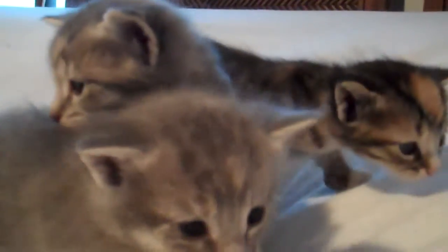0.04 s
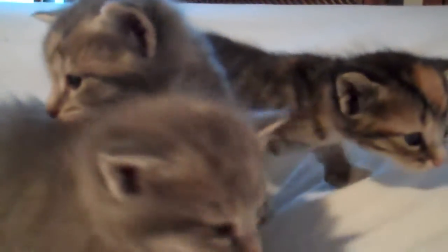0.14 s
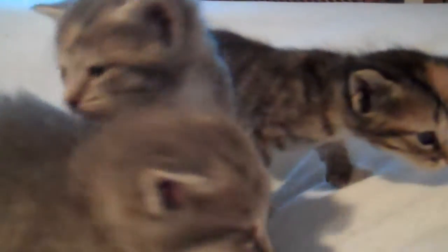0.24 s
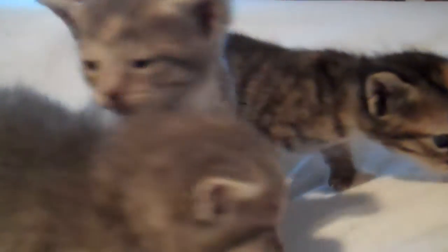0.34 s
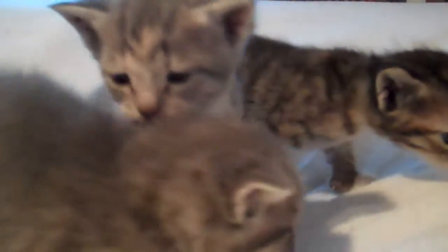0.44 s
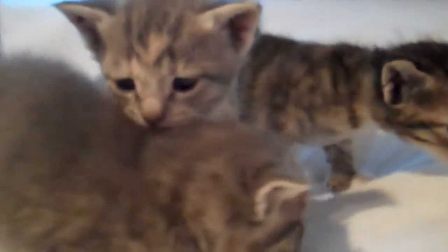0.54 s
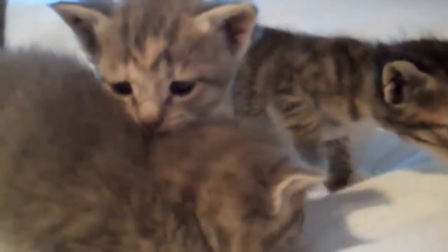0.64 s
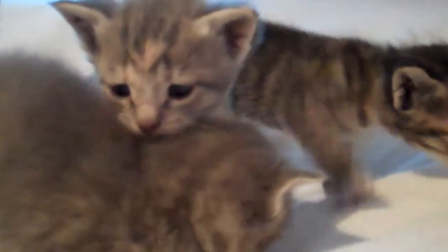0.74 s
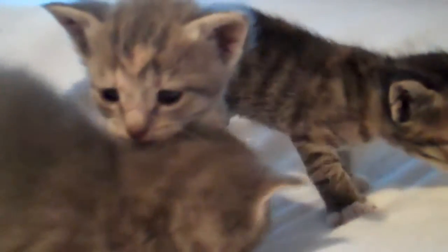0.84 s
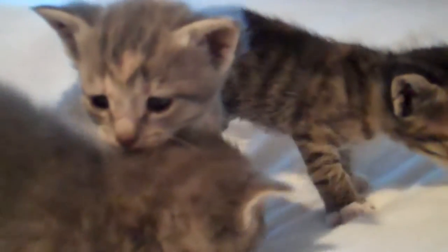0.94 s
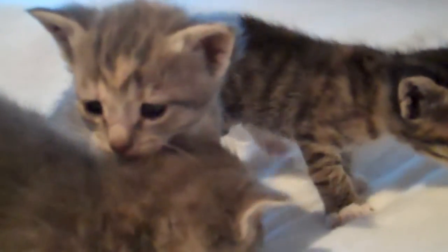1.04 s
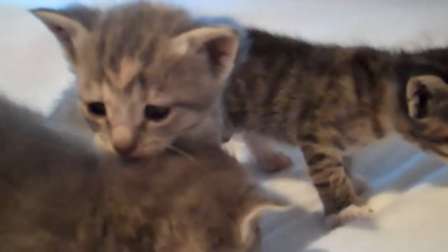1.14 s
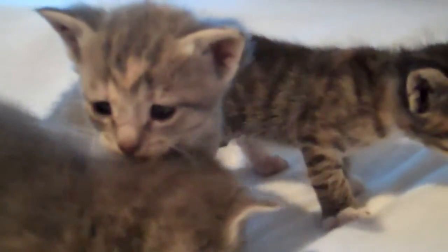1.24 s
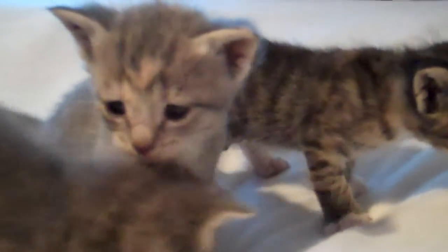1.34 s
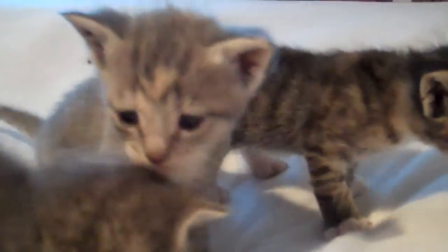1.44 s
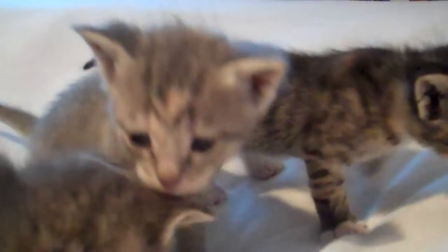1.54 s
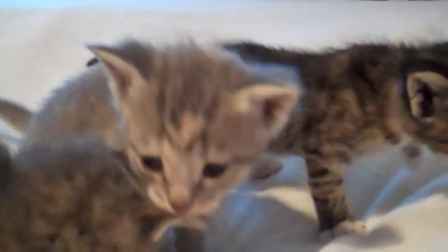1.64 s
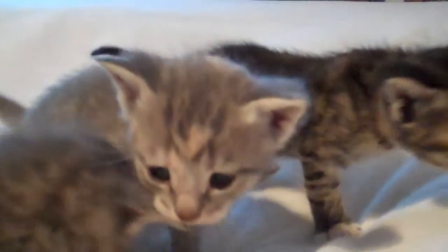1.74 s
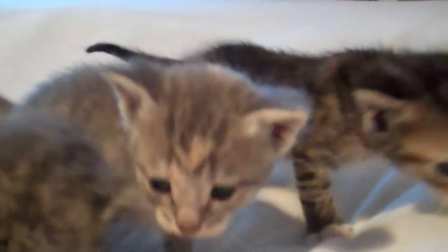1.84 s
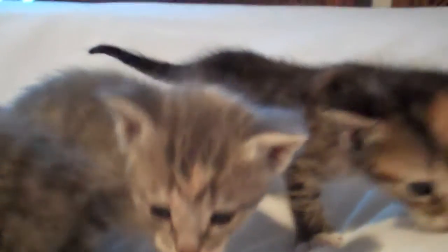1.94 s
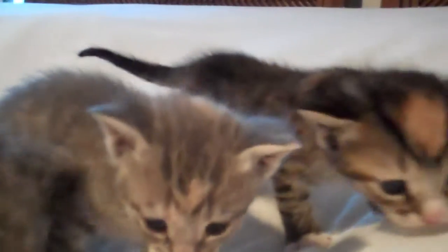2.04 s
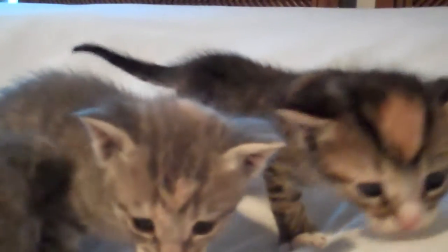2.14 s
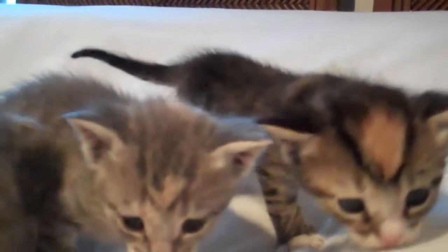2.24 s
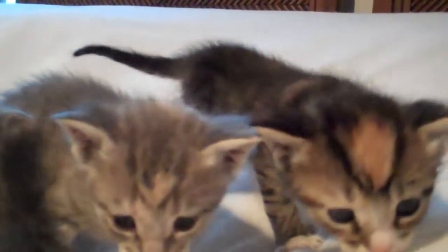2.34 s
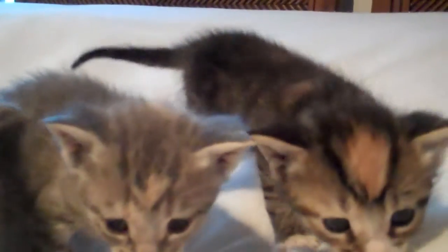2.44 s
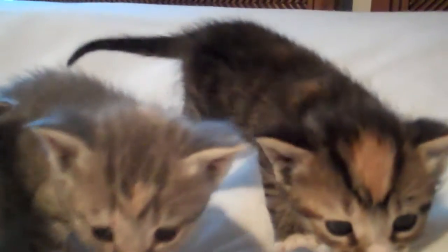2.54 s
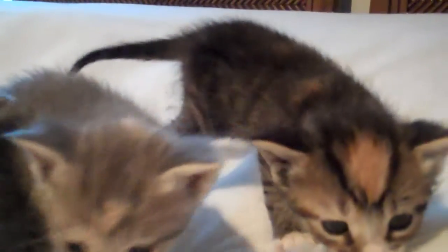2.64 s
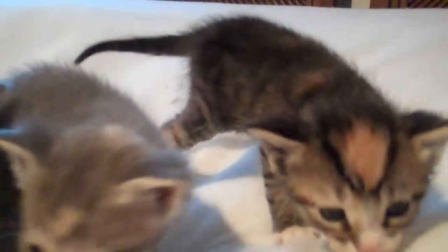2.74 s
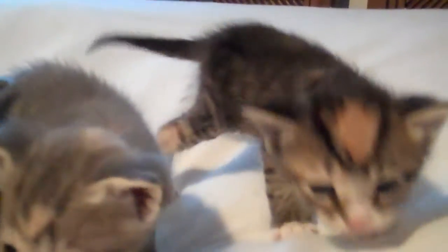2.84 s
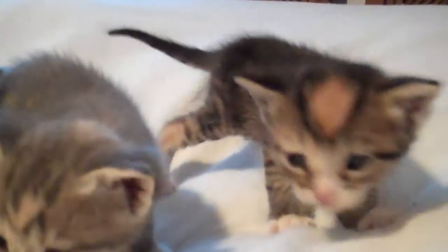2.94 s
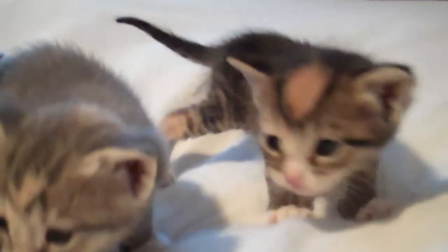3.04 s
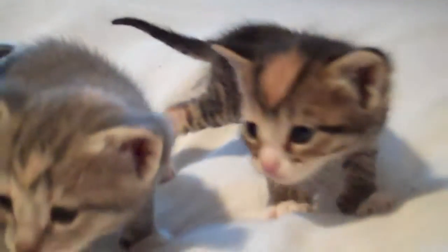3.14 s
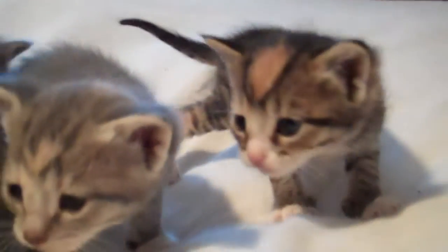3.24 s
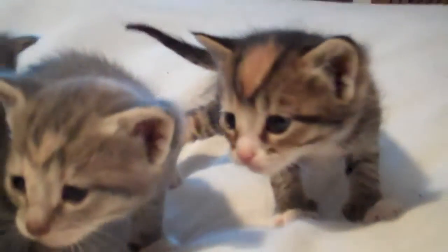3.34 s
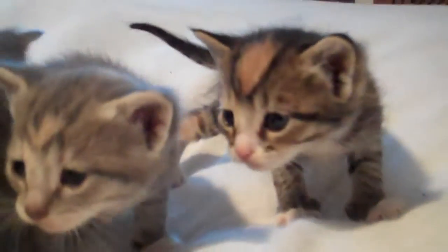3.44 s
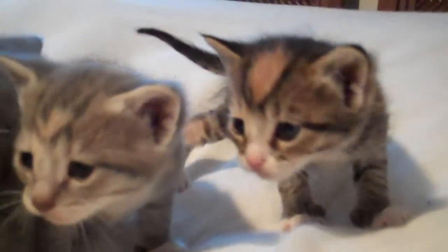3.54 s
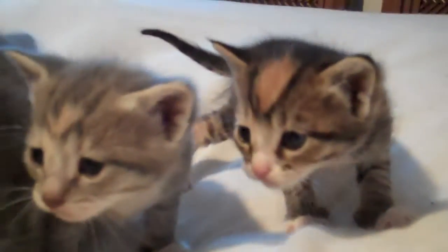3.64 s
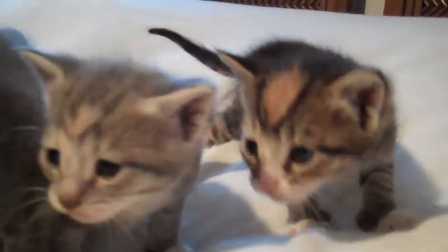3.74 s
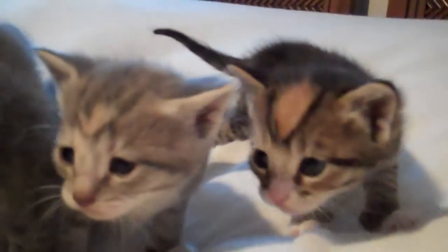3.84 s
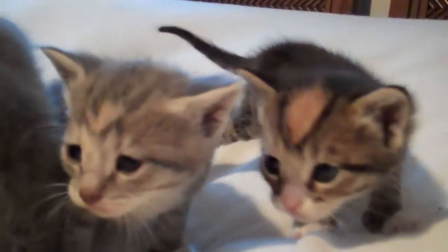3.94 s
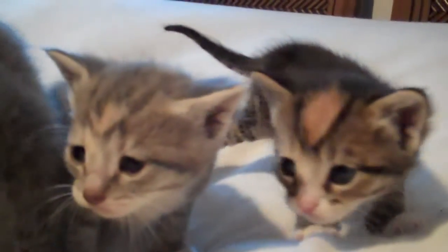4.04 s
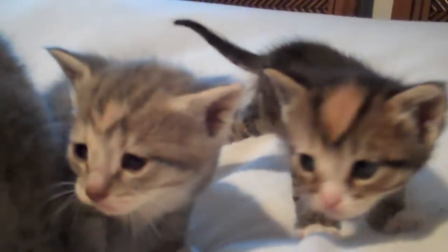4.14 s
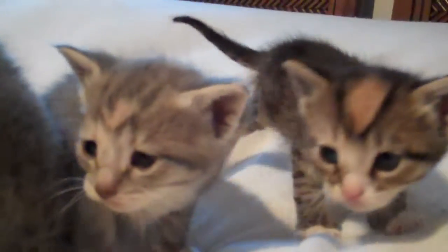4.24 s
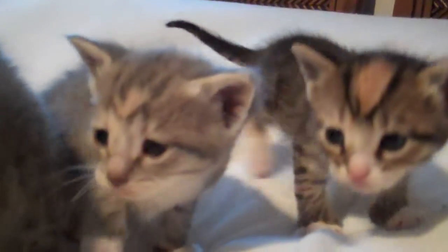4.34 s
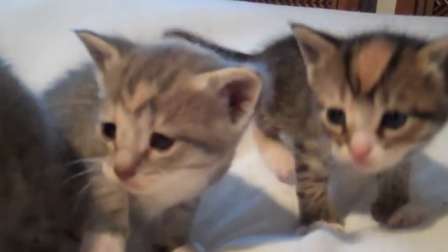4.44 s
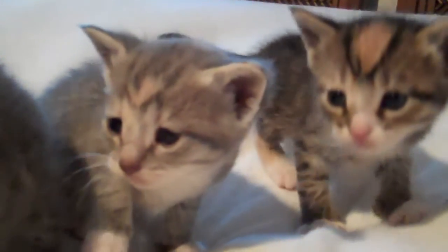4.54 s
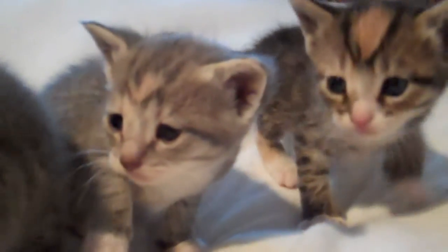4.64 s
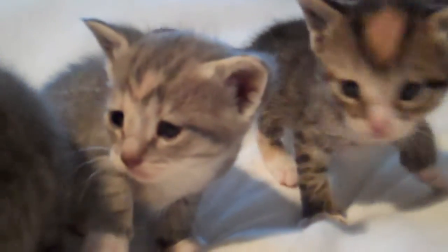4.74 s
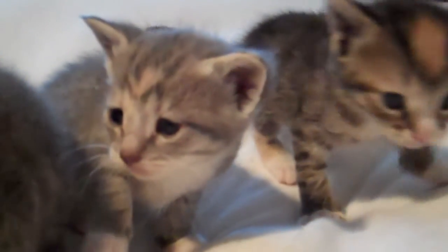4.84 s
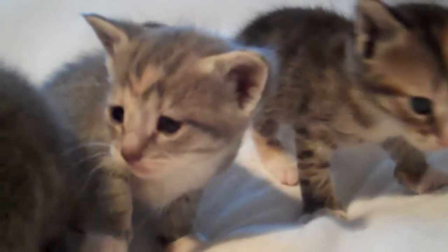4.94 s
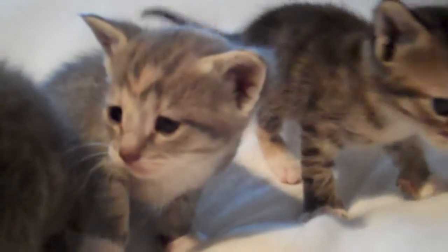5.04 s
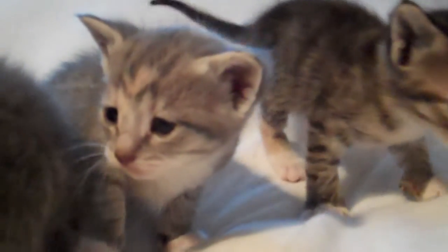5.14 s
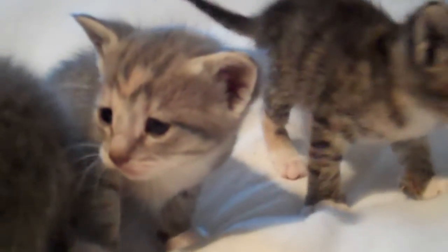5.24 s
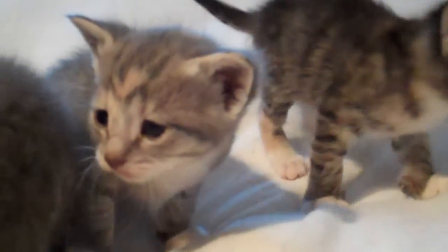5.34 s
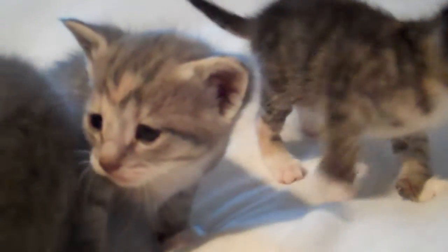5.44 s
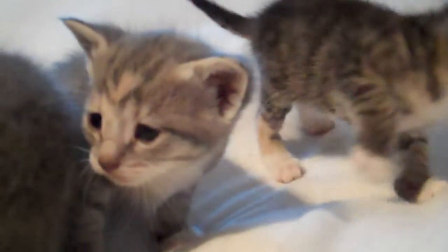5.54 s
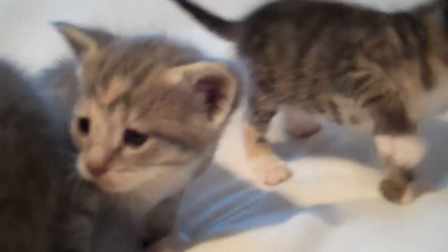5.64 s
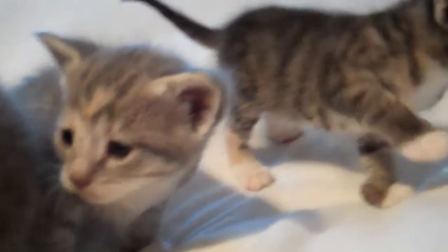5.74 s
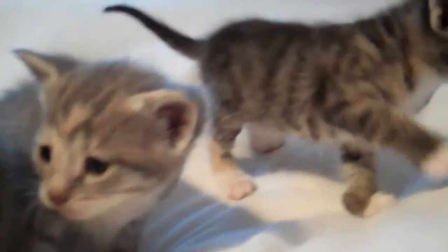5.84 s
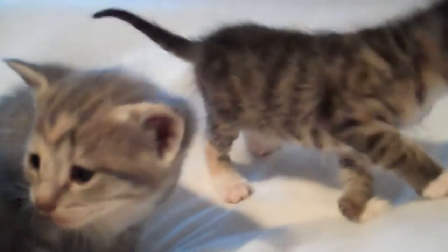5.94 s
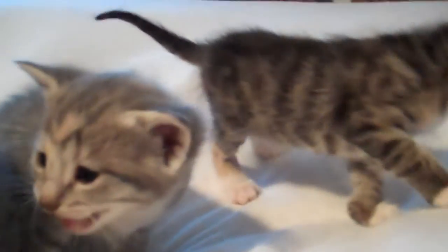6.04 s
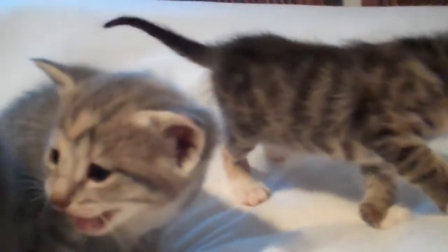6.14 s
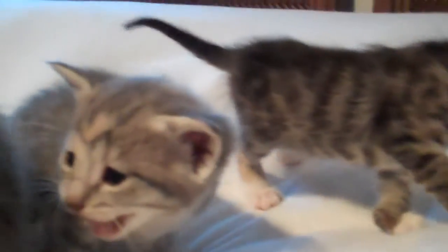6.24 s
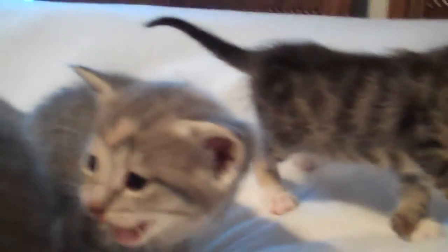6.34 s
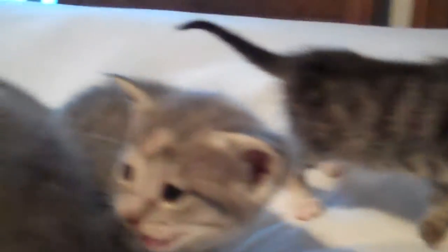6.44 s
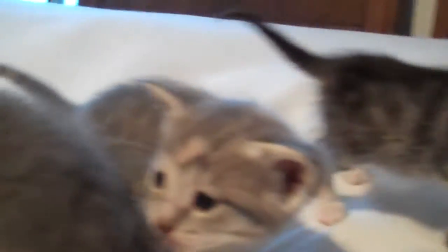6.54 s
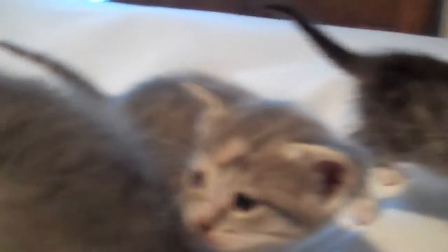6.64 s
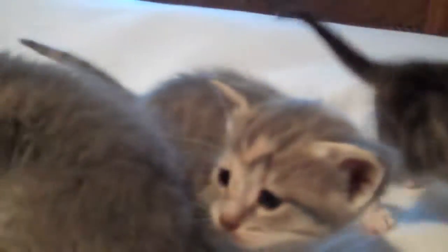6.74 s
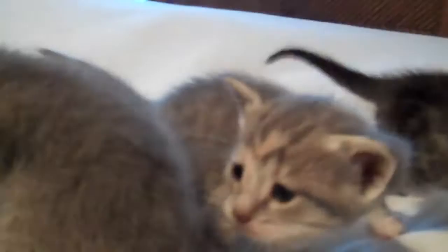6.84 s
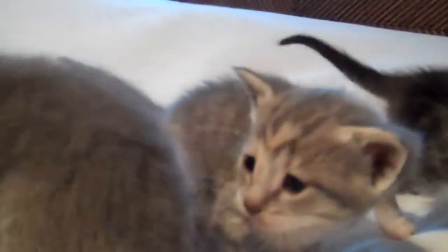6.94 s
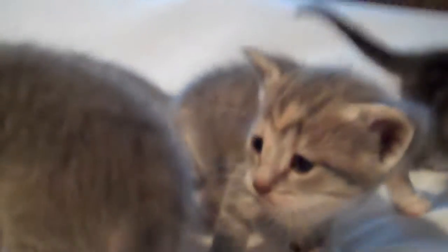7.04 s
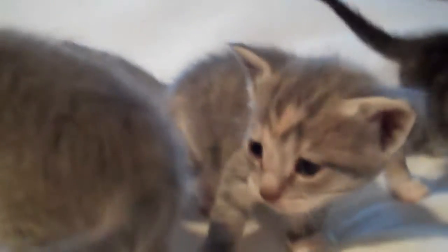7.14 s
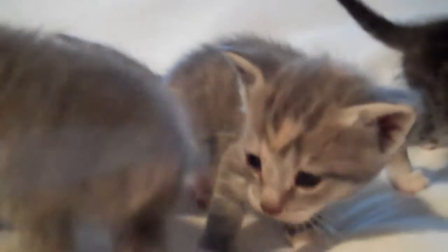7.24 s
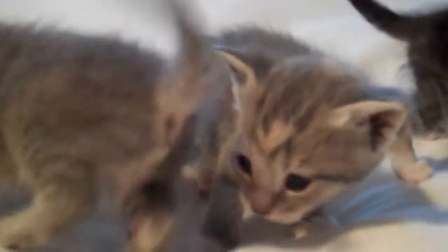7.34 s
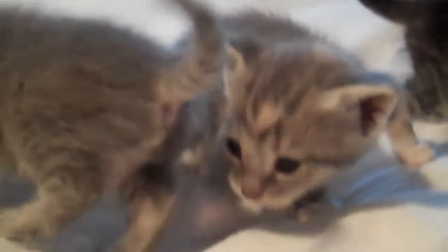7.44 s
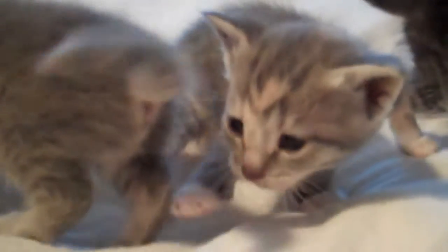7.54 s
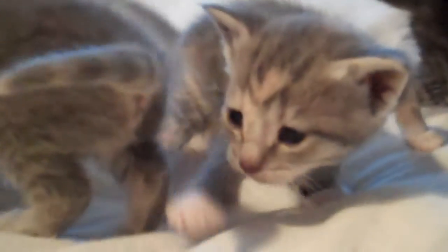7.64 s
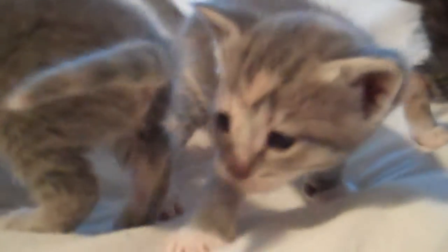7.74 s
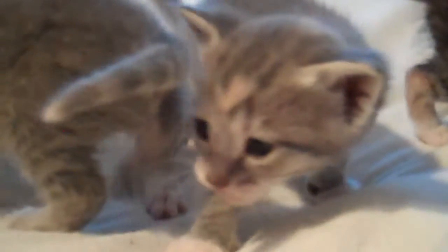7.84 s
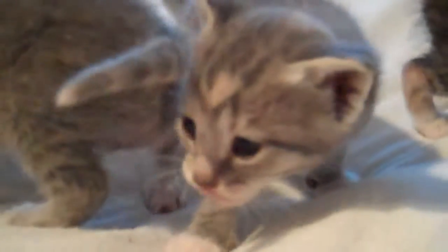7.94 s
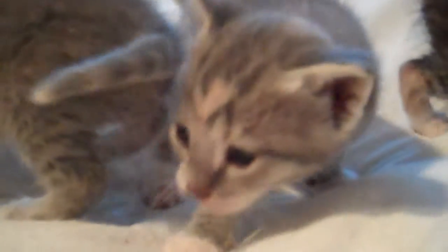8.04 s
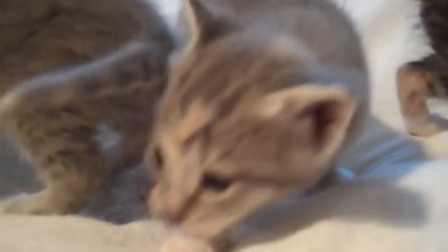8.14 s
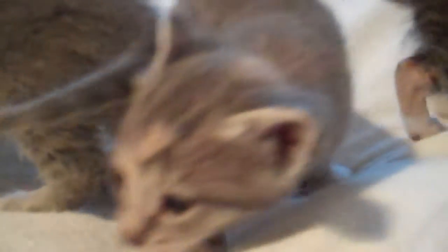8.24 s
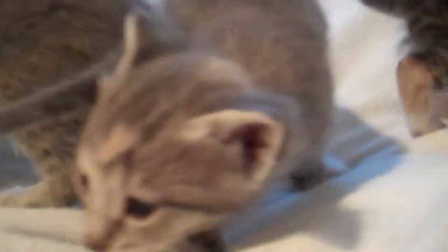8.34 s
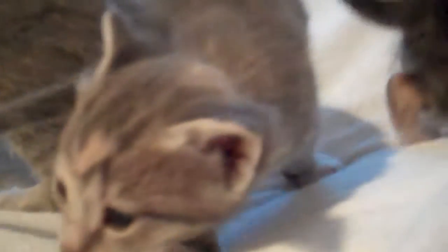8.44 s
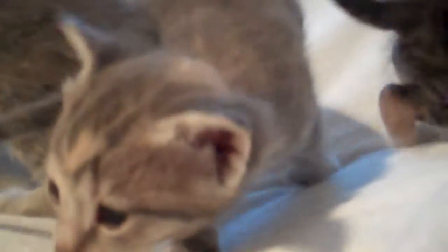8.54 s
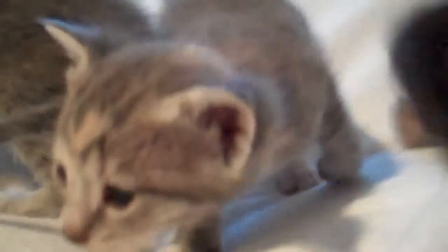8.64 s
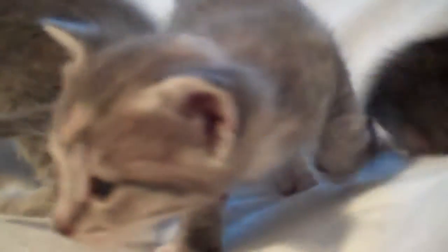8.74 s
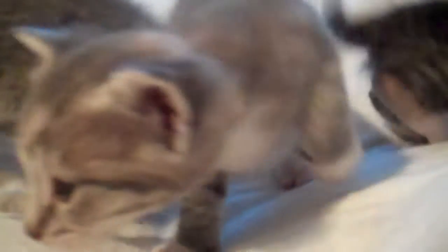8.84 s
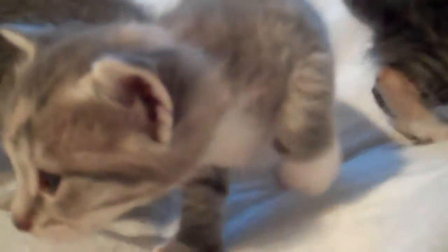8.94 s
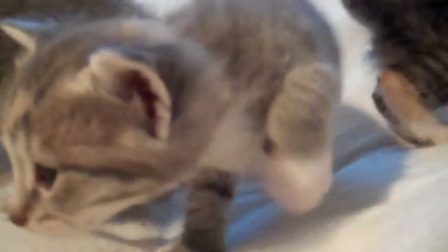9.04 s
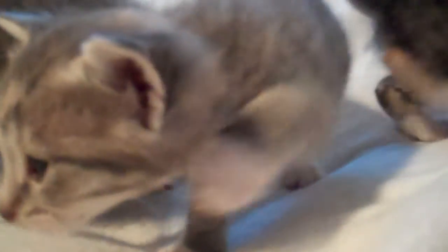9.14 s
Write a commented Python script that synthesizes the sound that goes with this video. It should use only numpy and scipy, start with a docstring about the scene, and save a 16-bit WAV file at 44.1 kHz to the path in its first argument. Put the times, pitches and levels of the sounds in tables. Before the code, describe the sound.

Close up in a quiet bedroom, small kittens give about nine high, gliding, slightly breathy mews. They come sparsely at first, crowd into a louder overlapping run, then turn faint. Between the calls there is soft rustling of fur on bedding, with tiny claw clicks and muffled paw steps. A faint hiss and electrical hum lie underneath, and a few thin bird chirps come from outside near the start.

```python
"""Kittens mew on a bed: gliding harmonics, shaped by throat and mouth and roughened by breath.
Fur swishes over the sheet, paws thud on the mattress, and short ticks, mostly claws in threads, dot it.
A bird chirps thinly beyond the window, and mains hum lies under the hiss of the room.
The bed is close to two small microphone ports, each of which colours the sound its own way."""
import sys
import numpy as np
from scipy import signal
from scipy.fft import rfft, irfft, next_fast_len
from scipy.io import wavfile
from scipy.ndimage import uniform_filter1d

SR = 44100
rng = np.random.default_rng(int(sys.argv[2]) if len(sys.argv) > 2 else 0)


def store_pcm(level_fs):
    """Save levels as 16-bit WAV."""
    pcm = np.round(np.clip(level_fs, -1, 1) * 32767).astype(np.int16)
    wavfile.write(sys.argv[1], SR, np.atleast_2d(pcm).T)


N = 404838

# The two ports resonate apart. Each row: frequency in Hz, left minus right in dB, left lead in radians.
PORT_IMBALANCE = [(40, -5, 0.94), (200, 0, 0.1), (1000, .5, 0.09), (4720, -1, 0.28), (6210, -6.5, 0),
                  (6480, -10, 1.3), (7670, 25.5, 3), (9700, 10.5, 2), (13000, 5.5, 0.5)]
# The air in the ports rings near 6 kHz. Each row: frequency in Hz, gain in dB.
PORT_RING = [(4500, -0.5), (5500, -1.5), (6300, 6.5), (7500, -1), (9000, -24), (14000, -32)]
# Stereo width of the noise beds. Each row: frequency in Hz, left-right correlation.
CORRELATION = [(60, 0.54), (150, 0.94), (380, 0.75), (940, 0.73), (2340, 0.24), (5860, -0.14),
               (14600, 0.088)]
# Tone of the room hiss, the swish and the bedding rumble. Each row: frequency in Hz, relative dB.
HISS_SPECTRUM = [(12, -41), (20, -11), (76, -26), (118, -31), (169, -1.5), (470, -10.5), (656, -2.5),
                 (865, -9), (1990, -10.5), (5380, -12.5), (7510, -31), (9110, -18), (13800, -17),
                 (15000, -54)]
SWISH_SPECTRUM = [(240, -43.5), (400, -9.5), (640, -11.5), (816, -7.5), (880, -4), (964, -5.5),
                  (1500, -9.5), (1800, -8.5), (5350, -7), (6220, -1), (7470, -3.5), (9810, -18),
                  (13900, -27), (15000, -53)]
RUMBLE_SPECTRUM = [(25, -8), (100, -9), (300, -4.5), (700, -9), (1500, -14.5), (3000, -48)]
# The mains tone and its octave. Each row: frequency in Hz, level in dB.
HUM_TONES = [(59.5, -70.5), (119, -63.5)]
# Fur swishes over the sheet; near 5.7-6.0 s the swells are a breathy hiss under two mews.
# Each row: centre in seconds, length in seconds, swish in dB, rumble in dB.
SWELLS = [(0.237, .14, -54, -55), (0.484, 0.53, -56.5, -63), (0.933, 0.17, -64, -73),
          (1.43, 0.3, -47.5, -77), (1.612, 0.13, -49.5, -69), (2.08, 0.48, -48.5, -66),
          (2.27, .12, -55, -70), (2.425, 0.24, -54.5, -68), (2.63, 0.19, -43.5, -75),
          (2.91, 0.32, -45, -60), (3.187, 0.36, -43, -51), (3.42, 0.46, -48, -52),
          (3.651, 0.35, -45.5, -49.5), (4.052, 0.34, -44, -59), (4.294, 0.25, -49, -64),
          (4.589, 0.13, -45, -65), (4.687, 0.09, -48, -61), (4.95, 0.1, -54, -65),
          (5.698, 0.48, -46.5, -79), (5.956, 0.48, -43, -80), (6.283, 0.11, -45, -63),
          (6.68, 0.43, -51, -68), (7.072, .24, -47.5, -73), (7.36, .3, -49.5, -67), (7.73, 1, -51, -58.5),
          (8.225, 0.61, -46, -56.5), (8.538, 0.52, -46.5, -62), (8.877, 0.51, -44, -59),
          (9.17, 0.13, -48, -65)]
# Short ticks, mostly claws catching threads. Each row: start in seconds, ring peak in dB, ring pitch in Hz,
# snap rms in dB, left minus right in dB.
SHORT_TICKS = [(0.038, -49, 926, -59, 0), (0.063, -53, 840, -56, 0.0), (0.078, -44, 1650, -53, -2),
               (0.126, -47, 703, -43, -11), (0.229, -25, 1620, -40.5, 4), (0.327, -31, 1630, -44.5, 2),
               (0.461, -54, 756, -50, 3), (0.547, -37, 1880, -48, -12), (0.599, -36.5, 1340, -52, 0.0),
               (0.688, -51, 840, -58, 2), (0.799, -48, 1180, -68, 4), (0.973, -39, 820, -53, 3),
               (2.256, -30, 2640, -40, 1), (2.403, -41, 2560, -57, 0.0), (2.425, -40, 2100, -42.5, 2),
               (3.561, -37.5, 710, -66, -1.0), (4.284, -41, 1260, -54, 1.0), (4.503, -44, 937, -53, 4),
               (4.525, -41, 1790, -50, -0.5), (4.838, -40, 899, -58, 0.5), (4.858, -44, 1290, -59, 0.5),
               (5.326, -58, 1650, -43.5, -10), (5.415, -45, 830, -53, -2), (5.577, -50, 1550, -49, 9),
               (6.068, -33, 1346, -34, 1.5), (6.1, -41, 1180, -48, 0.0), (7.057, -44, 1357, -38.5, 4),
               (7.237, -36, 2850, -48, -6), (7.456, -42, 905, -40.5, -3), (7.985, -31, 2550, -34, -1.0),
               (8.237, -44, 703, -43.5, -2), (8.28, -35.5, 750, -41.5, -3)]
# Four bird chirps, a squeak and a faint far tone. Each row: start and length in seconds,
# first, middle and last pitch in Hz, level in dB, octave overtone in relative dB.
THIN_NOTES = [(.548, 0.033, 5440, 5360, 4800, -53.5, -22), (.958, .045, 4660, 5020, 4300, -60, -22),
              (1.736, 0.042, 4340, 5200, 5100, -60, -30), (2.16, 0.037, 4470, 4770, 4700, -61, -30),
              (8.702, 0.034, 920, 1165, 1260, -44.5, -23), (1.64, 0.37, 830, 830, 830, -68.5, 2.5)]
# One contour a mew. Each row: time in seconds, pitch in Hz, overtone level in dB,
# treble lift in dB as the mouth opens.
MEW_CONTOURS = [
    [(1.051, 318, -47, -5), (1.091, 430, -46, -18), (1.191, 588, -40.5, 11.5), (1.236, 692, -34.5, 9),
     (1.261, 708, -35.5, 15.5), (1.371, 705.6, -32.5, 11), (1.431, 693, -34.5, -3), (1.501, 619, -43.5, 1),
     (1.551, 490, -40.5, -16), (1.591, 334, -47, -8)],
    [(2.506, 1580, -43, 1), (2.516, 1514, -45, 4), (2.526, 1165, -34, 2.3), (2.571, 1073, -39, 9),
     (2.741, 1061, -37, 4.5), (2.786, 1110, -38, 2), (2.861, 1110, -41, -6), (2.891, 1268, -40, -15),
     (2.961, 1235, -45.5, -16), (3.051, 1024, -47, -7), (3.101, 1075, -49, -17), (3.141, 1032, -56, -2)],
    [(2.691, 525, -37, -6), (2.726, 697, -36.5, 7), (2.811, 838, -34, 13.5), (2.956, 873.4, -31.5, 4),
     (3.001, 906, -32, 1), (3.101, 814, -32, -9), (3.221, 758, -33.5, -30), (3.261, 648, -34.5, -2),
     (3.331, 362, -42.5, -6)],
    [(5.501, 388, -42.5, -16), (5.551, 646, -42.5, -49), (5.591, 786, -30, -4), (5.65, 843, -37, 29.5),
     (5.721, 920, -37, 30), (5.766, 1014, -19.5, 14), (5.901, 973, -24, 15), (5.936, 915, -20.5, 9),
     (5.996, 774, -38.5, 18), (6.061, 542.6, -55, 12.8)],
    [(5.616, 472, -39, 17), (5.645, 491.7, -35.5, 14), (5.698, 589, -41, 22.5), (5.742, 626, -46, 27.5),
     (5.771, 714, -42, 24.5), (5.831, 725, -31, 12.5), (5.851, 700, -39, 18), (5.931, 698, -28.5, -5),
     (6.006, 531, -30, -5), (6.051, 402, -49, 12)],
    [(6.221, 1637, -15.5, -17.5), (6.25, 1490, -18, -7), (6.281, 1360, -34, 18.5), (6.336, 1333, -30, 15),
     (6.41, 1282, -31, 13.5), (6.48, 1263, -30, 13.5), (6.56, 1203, -28.5, 8.5), (6.7, 1187, -28, -6.5),
     (6.756, 1139, -32, -5), (6.78, 1387, -25, -13), (6.798, 1620, -44, -9)],
    [(6.616, 391.5, -50, 2), (6.656, 480, -47.5, 8), (6.681, 600, -42, -1), (6.711, 584, -49, 5),
     (6.75, 627, -48, 10.5), (6.814, 678.6, -46, 16.5), (6.921, 744, -43.5, 10), (7.026, 723, -37.5, -4.5),
     (7.091, 648, -46.5, -8), (7.146, 403, -52, -3)],
    [(7.786, 418, -51, -6), (7.826, 453, -55, 15), (7.876, 537, -55, 21.5), (8.001, 625, -52.5, 21.5),
     (8.026, 661, -47, 11.5), (8.1, 682, -49.5, 18.5), (8.198, 612, -49, 2), (8.222, 516, -52, -6),
     (8.241, 505, -56, -6)],
    [(8.796, 419, -40, -19), (8.861, 470.3, -57, 7), (8.901, 558, -58, 14), (8.941, 592, -46.5, 8.5),
     (9.016, 601.4, -39, 5), (9.046, 589.5, -39, -0.5), (9.101, 530, -37.5, -3.5), (9.176, 431, -40.5, -10)],
]
# Each entry: a mew's fundamental at its highest pitch, in dB.
MEW_FUNDAMENTALS_DB = [-47.5, -39, -42, -44.5, -54, -39.5, -55.5, -54, -55.5]
# Breath in each mew. Each row: amount on a held pitch from 0 to 1,
# glide speed that brings full breath in octaves a second.
MEW_BREATHS = [(.03, 8), (.05, 40), (.02, 9), (.05, 10), (.07, 13), (.09, 14), (.07, 8), (.1, 7), (.1, 6)]
# Throat and mouth at each mew's highest pitch. Each row: gain in dB at each frequency of THROAT_HZ.
MEW_THROATS = [(-14.4, -41, -1, 1, -6, -15, -48, -14.5, -13, -39, -33, -34, -22),
               (-4.2, -4.2, -4.2, -4, 0.5, -6.5, -2.5, -6.5, -1.5, -17.5, -4, -8.5, -10),
               (-17, -8.5, 0, -19, -24, -19, -37, -49, -44, -26, -24.5, -24, -14),
               (-20.3, -42, 8, -15, -12.5, -6.5, -32, -35, -29.5, -28, -61, -26, -32),
               (-15.6, -16.1, -19.5, -7, -30, 2.5, -23.5, -18.5, -33, -25, -19.5, -21.5, -39),
               (-14.0, -14.0, -14.0, 0.5, -12, -16.5, -26, -6, -22, -9.5, -23.5, -20.5, -9.5),
               (-11.1, -22.7, -6.5, -1, -9.5, -7, -17, -12.5, -6.5, -12.5, -17, -42, -22),
               (-5.4, -5.4, -3.5, -2.5, -5.5, -6, -21, -17, -11, -15, -24, -25, -34),
               (-8.5, -37, -9.5, -21, -12, -16, 0, -19.5, -20, -14.5, -7, -9, -3)]
THROAT_HZ = [400, 800, 1300, 1900, 2500, 3100, 3800, 4600, 5500, 6500, 8000, 10000, 14000]
# Placement of each mew. Each row: left minus right in dB, left lead in milliseconds,
# how far the mouth follows the pitch from 0 to 1.
MEW_PLACES = [(-0.4, 0.074, 0.78), (3.5, 0.064, 0.08), (0.3, 0.04, 0.0), (-0.5, .12, 0.12),
              (0.5, 0.04, 0.77), (1, 0.0017, 0.14), (-0.7, 0.066, 0.7), (-1, 0.056, 1.0), (0, 0.046, 0.64)]
# Attack of each mew. Each row: rise time in seconds, length of the creak in seconds.
MEW_ONSETS = [(.01, 0), (.002, 0), (.003, .01), (.015, 0), (.02, 0), (.001, .034), (.02, 0), (.02, .05),
              (.03, .12)]
# Paws land on the mattress. Each row: start in seconds, peak in dB, pitch in Hz, 60 dB decay in seconds.
PAW_THUDS = [(1.766, -56, 121, 0.06), (2.691, -33.5, 251, 0.24), (2.963, -34.5, 360, 0.1),
             (3.108, -36, 299.6, 0.088), (3.188, -37, 323, 0.093), (3.379, -36.5, 372, 0.17),
             (3.554, -44, 272, 0.098), (3.621, -44, 121, 0.042), (3.701, -62, 121, 0.06),
             (3.875, -39, 188, 0.098), (4.042, -36.5, 383, 0.11), (4.953, -46, 463, 0.036),
             (5.493, -38.5, 473, 0.032), (8.256, -30.5, 412, 0.11), (8.428, -37, 495, 0.05),
             (8.529, -42.5, 233, 0.089), (8.861, -41.5, 450, 0.077)]

HISS_DB, REVERB_DB = -59, -14
REST_SWISH_DB, REST_RUMBLE_DB = -54, -63  # the bed is never quite still
DIFFUSE_SHARE = 0.56  # of the port imbalance, left in the noise beds above 1 kHz
TOP_HZ = 14300
FLUTTER = .0075  # share of the pitch
SAG_DB = -19.5  # the fundamental fades with the square of the octaves below the top pitch
CREAK_BREATH = .5  # added while a mew creaks


def gain_of(db):
    """Decibels to a factor."""
    return 10 ** (np.asarray(db) / 20)


def unit_rms(x):
    """Scales to rms 1."""
    return x / np.sqrt(np.mean(x ** 2) + 1e-20)


def curve_at(points, hz, column=1):
    """One column of a spectrum, joined on a log-frequency axis."""
    table = np.transpose(points)
    return np.interp(np.log(hz + 1), np.log(table[0] + 1), table[column])


def drift(count, span):
    """A random control signal of rms 1, smoothed over span steps."""
    return unit_rms(uniform_filter1d(rng.standard_normal(count), size=span))


def add(mix, start_s, sound):
    """Lays a stereo sound into the mix."""
    part = mix[:, round(start_s * SR):][:, :sound.shape[1]]
    part += sound[:, :part.shape[1]]


def ports(x, pan_db=0., lead_ms=0.):
    """One source reaches both ports, each with its own colour and delay."""
    size = next_fast_len(len(x) + 256)
    hz = np.fft.rfftfreq(size, 1 / SR)
    apart_db = curve_at(PORT_IMBALANCE, hz) + pan_db
    left_share = 1 / (1 + gain_of(-2 * apart_db))
    lead = curve_at(PORT_IMBALANCE, hz, column=2) + 2 * np.pi * hz * lead_ms / 1000
    turn = np.exp(.5j * lead)
    spectrum = rfft(x, size)
    left = spectrum * np.sqrt(2 * left_share) * turn
    right = spectrum * np.sqrt(2 - 2 * left_share) / turn
    return irfft([left, right], size)


def noise_bed(spectrum, patchy_db, flicker_db):
    """Diffuse stereo noise from random short-time spectra, patchy in tone and flickering in level."""
    frames, hz = N // 128 + 5, np.fft.rfftfreq(512, 1 / SR)
    a, b, c, d, patches = rng.standard_normal((frames, 257, 5)).T
    left, unrelated = a + 1j * b, c + 1j * d
    patches = unit_rms(uniform_filter1d(uniform_filter1d(patches, size=6, axis=0), size=14, axis=1))
    flicker = drift(frames, 3)
    alike = np.clip(curve_at(CORRELATION, hz), -1, 1)[:, None]
    spectra = np.array([left, alike * left + np.sqrt(1 - alike ** 2) * unrelated])
    apart_db = curve_at(PORT_IMBALANCE, hz) * np.where(hz < 1000, 1, DIFFUSE_SHARE)
    spectra *= gain_of(np.array([apart_db, -apart_db]) / 2)[:, :, None]
    spectra *= gain_of(curve_at(spectrum, hz)[:, None] + patchy_db * patches + flicker_db * flicker)
    return unit_rms(signal.istft(spectra, nperseg=512, noverlap=384)[1][:, :N])


def room_hiss():
    """Room tone: a soft, nearly steady hiss."""
    return gain_of(HISS_DB) * noise_bed(HISS_SPECTRUM, patchy_db=0.88, flicker_db=0.312)


def mains_hum():
    """Low mains tones that waver a little in level and phase."""
    t = np.arange(N) / SR
    tones = np.zeros(N)
    for hz, db in HUM_TONES:
        level = gain_of(db + 1.9 * drift(N, 4000))
        tones += level * np.sin(2 * np.pi * hz * t + 0.25 * drift(N, 4000))
    return np.sqrt(2) * ports(tones)[:, :N]


def swell_envelopes():
    """Each swell rises and fades over the restless bed: one envelope for swish, one for rumble."""
    centre, length, swish_db, rumble_db = np.transpose(SWELLS)
    t = np.arange(0, N + 64, 64) / SR
    swell = np.cos(np.pi * np.clip((t - centre[:, None]) / length[:, None], -.5, .5)) ** 4
    powers = (gain_of(2 * rest_db) + gain_of(2 * db) @ swell
              for rest_db, db in ((REST_SWISH_DB, swish_db), (REST_RUMBLE_DB, rumble_db)))
    return (np.interp(np.arange(N) / SR, t, np.sqrt(power)) for power in powers)


def rustle():
    """Fur swish or breathy hiss over bedding rumble; fibres crackle at random, louder in the swells."""
    swish, rumble = swell_envelopes()
    sound = swish * noise_bed(SWISH_SPECTRUM, patchy_db=2.23, flicker_db=1.5)
    sound += rumble * noise_bed(RUMBLE_SPECTRUM, patchy_db=1.4, flicker_db=1.44)
    for when, size, pitch, brightness, side in rng.random((300, 5)):
        crackle_db = 4.7 + 7.9 * size ** 4
        crackle = tick(ring_db=crackle_db - 14 * brightness, ring_hz=700 * 4 ** pitch,
                       snap_db=crackle_db - 13 - 14 * (1 - brightness), pan_db=10 * (side - .5))
        add(sound, when * N / SR, swish[int(when * N)] * crackle)
    return sound


def tick(ring_db, ring_hz, snap_db, pan_db):
    """A short low ring and a sharp snap that excites the ports, as when a thread snaps free."""
    t = np.arange(256) / SR
    ring = np.sin(2 * np.pi * ring_hz * t) * np.exp(-t * ring_hz / 1.12)
    hz = np.fft.rfftfreq(len(t), 1 / SR)
    burst = rng.standard_normal(len(t)) * np.exp(-abs(t - .0005) / .0001)
    low_cut = np.clip(hz / 6500, 0, 1) ** 2
    snap = irfft(rfft(burst) * gain_of(0.66 * curve_at(PORT_RING, hz)) * low_cut)
    sound = gain_of(ring_db) * ring / ring.max() + gain_of(snap_db) * unit_rms(snap)
    return ports(sound, pan_db, lead_ms=rng.uniform(-0.043, 0.036))


def bedroom_reverb(x):
    """Sparse reflections of random sign that die quickly among soft furnishings."""
    delays = np.arange(150, 12000, 20) + rng.integers(0, 20, (2, 593))
    decay = gain_of(-60 * delays / SR / 0.13)  # 60 dB down in 0.13 s
    taps = np.zeros((2, 12100))
    np.put_along_axis(taps, delays, rng.choice([-1., 1.], delays.shape) * decay, 1)
    return signal.fftconvolve(x, taps / np.linalg.norm(taps[0]), axes=1)[:, :N]


def thin_note(length, first_hz, middle_hz, last_hz, db, octave_db):
    """A chirp, squeak or far tone: a sine and its octave, drawn through three pitches."""
    progress = np.linspace(0, 1, round(length * SR))
    hz = np.polyval(np.polyfit([0, .5, 1], [first_hz, middle_hz, last_hz], 2), progress)
    phase = 2 * np.pi * np.cumsum(hz) / SR
    tone = np.sin(phase) + gain_of(octave_db) * np.sin(2 * phase)
    return ports(np.sqrt(2) * gain_of(db) * tone * signal.windows.tukey(len(tone), .4))


def mew(contour, fundamental_db, breathing, throat_db, place, onset):
    """Harmonics pass a mouth that opens as the pitch climbs; breath blurs them in bursts."""
    held_breath, full_glide = breathing
    pan_db, lead_ms, mouth_follows = place
    rise_s, creak_s = onset
    times, *columns = np.transpose(contour)
    start, end = times[0], times[-1]
    t = np.arange(start, end, 1 / SR)
    hz, overtone_db, treble_db = (np.interp(t, times, column) for column in columns)
    hz = uniform_filter1d(hz, size=300, mode="nearest")
    formant_shift = (hz / hz.max()) ** mouth_follows
    octaves = np.log2(hz / hz.max())

    # Fast glides and the opening creak make the voice breathy.
    glide = uniform_filter1d(abs(np.gradient(octaves)) * SR, size=900, mode="nearest")
    creaking = np.clip((start + creak_s - t) / .004, 0, 1)
    breath = np.clip(held_breath + (glide / full_glide) ** 2 + CREAK_BREATH * creaking, 0, 1)
    shake = unit_rms(signal.fftconvolve(rng.standard_normal(len(t)), np.hanning(700), "same"))
    bursts = drift(len(t), 130)
    hz = hz * (1 + FLUTTER * shake)

    harmonic = np.arange(1, 30)[:, None]
    harmonic_hz = harmonic * hz
    formants_db = curve_at(list(zip(THROAT_HZ, throat_db)), harmonic_hz / formant_shift)
    db = overtone_db + formants_db + curve_at(PORT_RING, harmonic_hz)
    db += treble_db * np.clip(np.log2(harmonic_hz / 2400) / 0.61, 0, 1)  # shelf above 2400 Hz
    db[0] = fundamental_db + SAG_DB * octaves ** 2
    # The kitten turns its head, and each harmonic swells and fades on its own.
    waver = unit_rms(signal.fftconvolve(rng.standard_normal(db.shape), np.hanning(3500)[None], "same"))
    db += 1.21 * np.sqrt(harmonic) * waver

    # Breath trades pure tone for a narrow band of noise, high harmonics first.
    air = uniform_filter1d(rng.standard_normal((*db.shape, 2)), size=40, axis=1)
    air = unit_rms(uniform_filter1d(air, size=40, axis=1)) / np.sqrt(2)
    rough = np.clip(breath * gain_of(5.15 * bursts) * ((harmonic_hz - hz) / 3000), 0, 1)
    blur = np.sqrt(1 - rough ** 2) + rough * (air[..., 0] + 1j * air[..., 1])
    cycles = np.cumsum(hz) / SR
    phase = 2 * np.pi * (harmonic * cycles + rng.random(harmonic.shape))
    tones = gain_of(db) * (harmonic_hz < TOP_HZ) * (blur * np.exp(1j * phase)).real

    # In a creak strong and weak pulses alternate, which puts tones halfway between the harmonics.
    depth = 1.6 * creaking
    overtones = tones[1:].sum(0) * (1 - depth / 2 + depth * np.cos(np.pi * cycles))
    envelope = np.clip(np.minimum((t - start) / rise_s, (end - t) / 0.005), 0, 1)
    return start, ports(np.sqrt(2) * (tones[0] + overtones) * envelope, pan_db, lead_ms)


def paw_thud(db, hz, decay_s):
    """A soft blow on the mattress: a low push and a puff of noise near its pitch."""
    t = np.arange(round(.15 * SR)) / SR
    band = signal.butter(1, [hz / 2, hz * 1.34], "band", fs=SR)
    puff = unit_rms(signal.lfilter(*band, rng.standard_normal(len(t))))
    envelope = gain_of(-60 * t / decay_s) * (1 - np.exp(-t / 0.0015))
    sound = (np.sin(2 * np.pi * hz * t) + 1.35 * puff) * envelope
    return ports(gain_of(db) * sound / abs(sound).max())


def scene():
    """Mews, notes, ticks and paws with a touch of room, over rustle, hum and hiss."""
    events = np.zeros((2, N))
    for voice in zip(MEW_CONTOURS, MEW_FUNDAMENTALS_DB, MEW_BREATHS,
                     MEW_THROATS, MEW_PLACES, MEW_ONSETS):
        add(events, *mew(*voice))
    for source, cues in ((thin_note, THIN_NOTES), (tick, SHORT_TICKS), (paw_thud, PAW_THUDS)):
        for start, *settings in cues:
            add(events, start, source(*settings))
    reverb = gain_of(REVERB_DB) * bedroom_reverb(events)
    return events + reverb + rustle() + mains_hum() + room_hiss()


def record(dry):
    """A steep low-pass takes the very top off the mix."""
    low_pass = signal.firwin(511, TOP_HZ, window=("kaiser", 9), fs=SR)
    return signal.oaconvolve(dry, low_pass[None], "same")


dry = scene()
out = record(dry)
store_pcm(out)
```